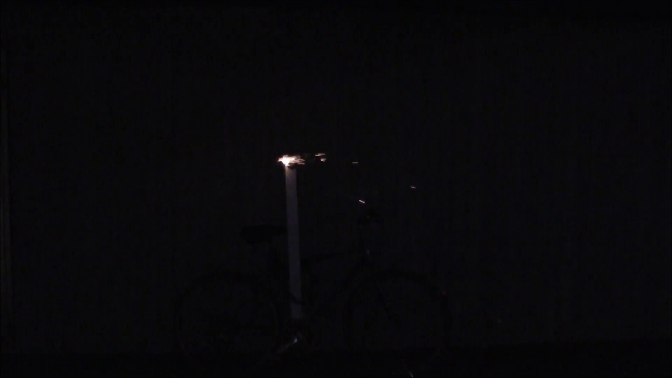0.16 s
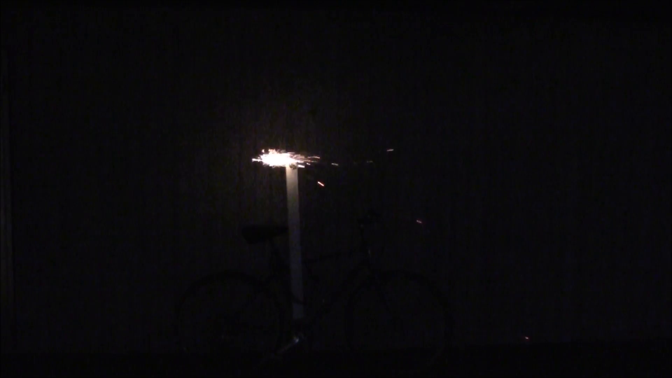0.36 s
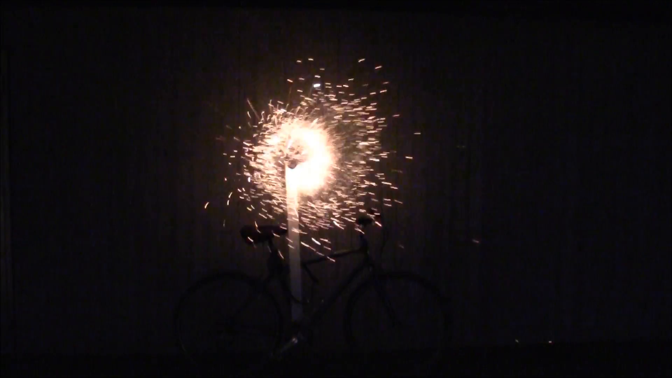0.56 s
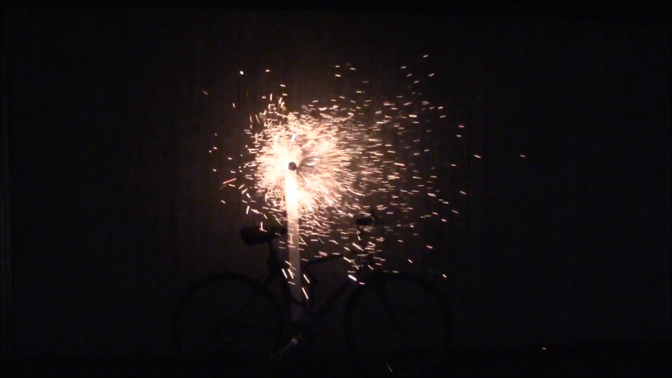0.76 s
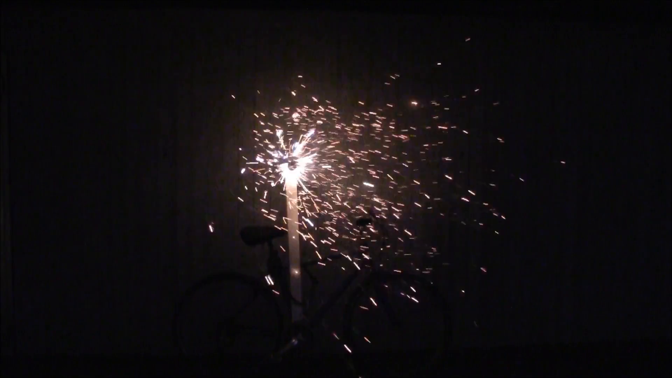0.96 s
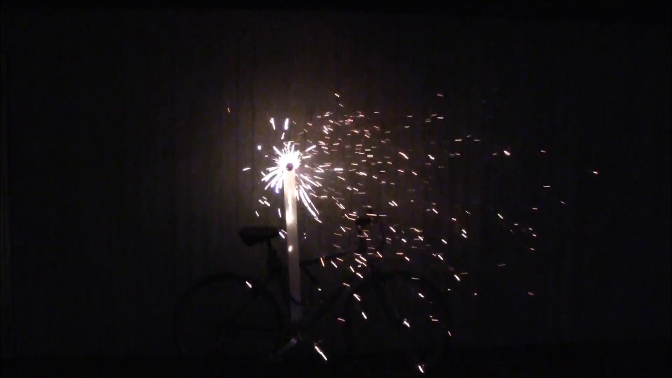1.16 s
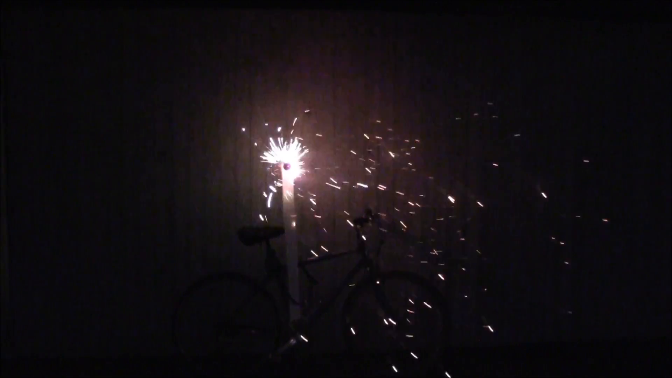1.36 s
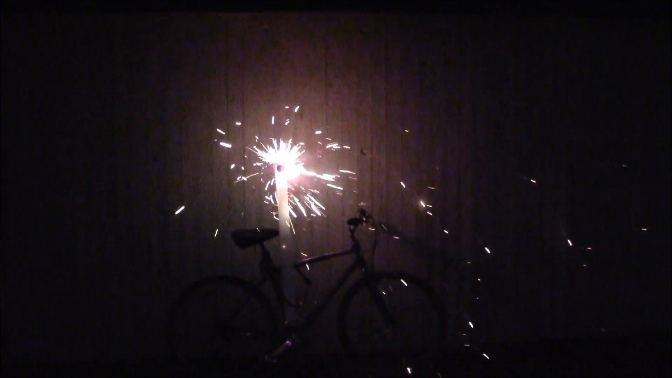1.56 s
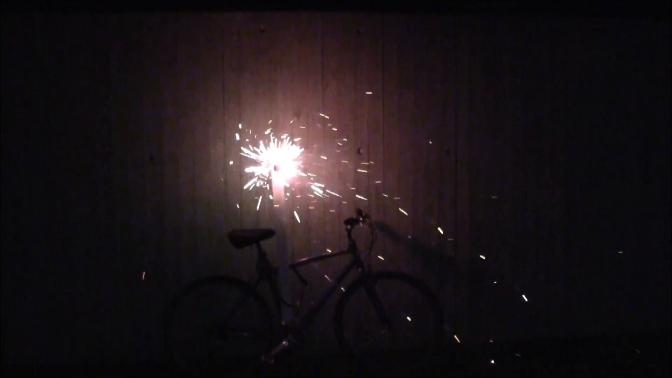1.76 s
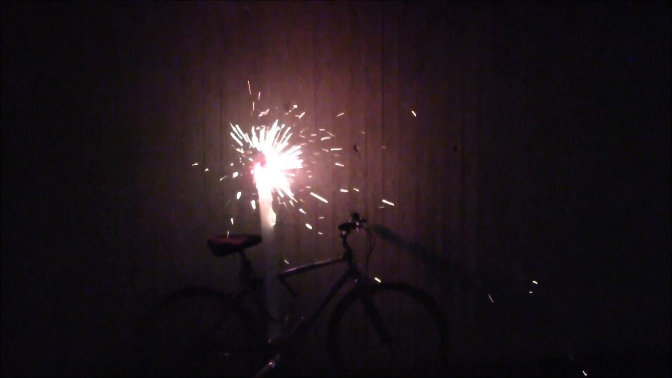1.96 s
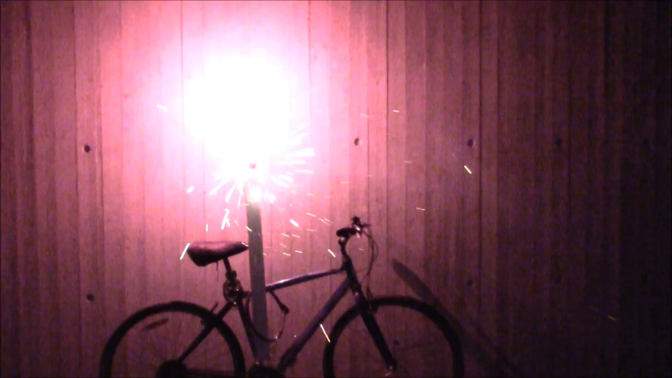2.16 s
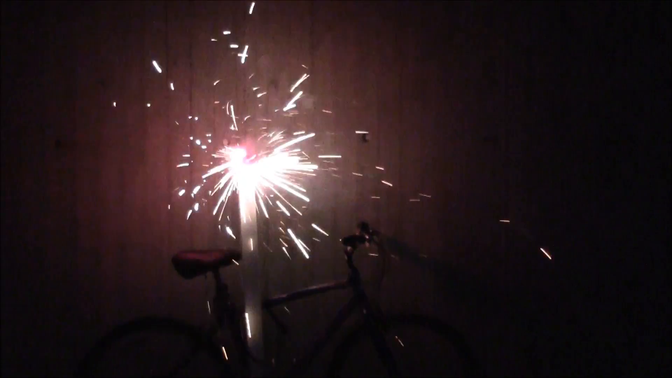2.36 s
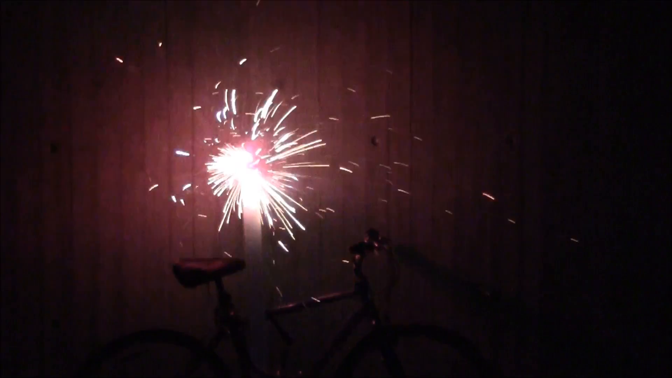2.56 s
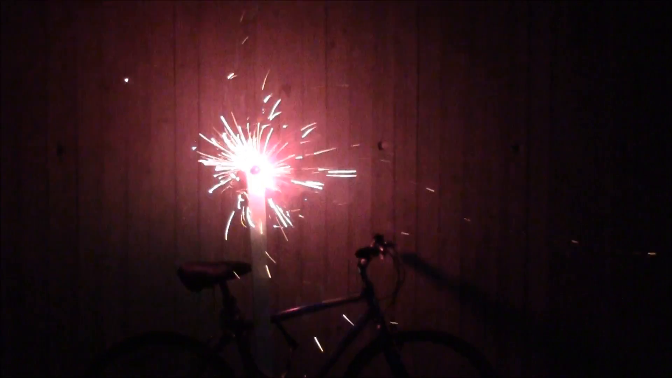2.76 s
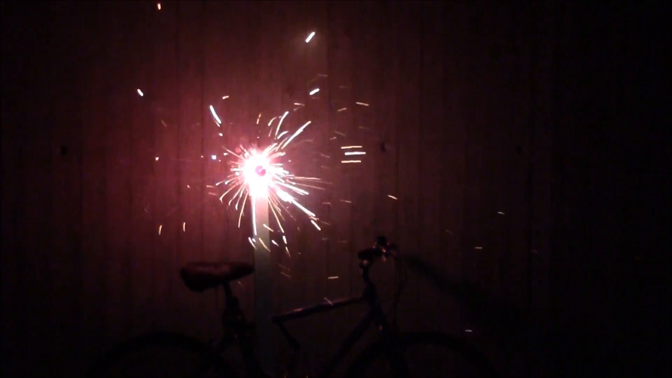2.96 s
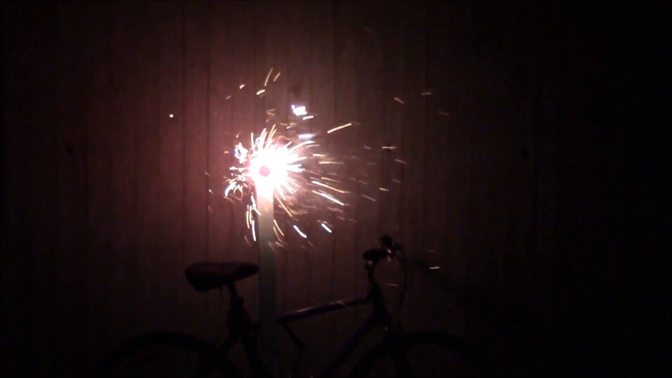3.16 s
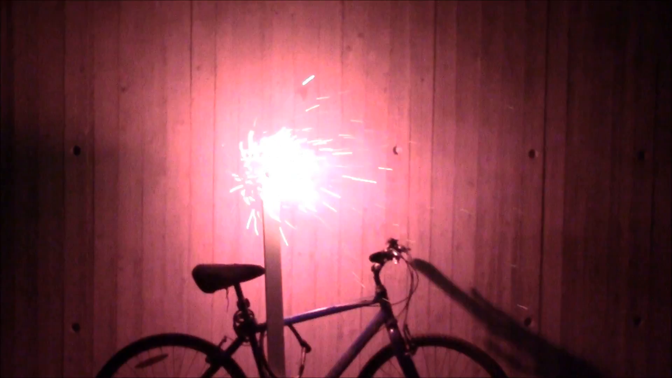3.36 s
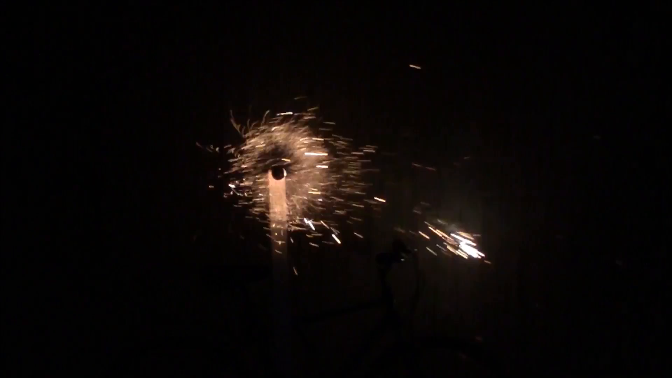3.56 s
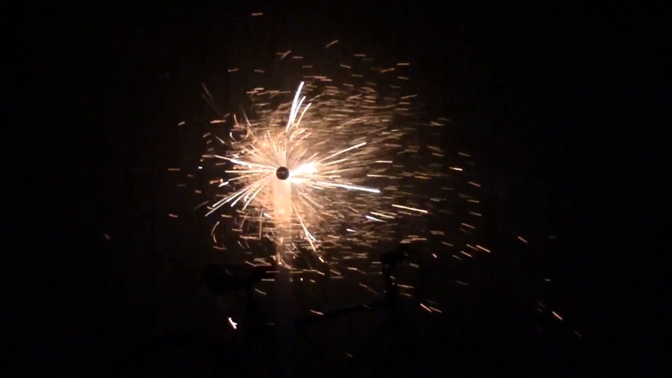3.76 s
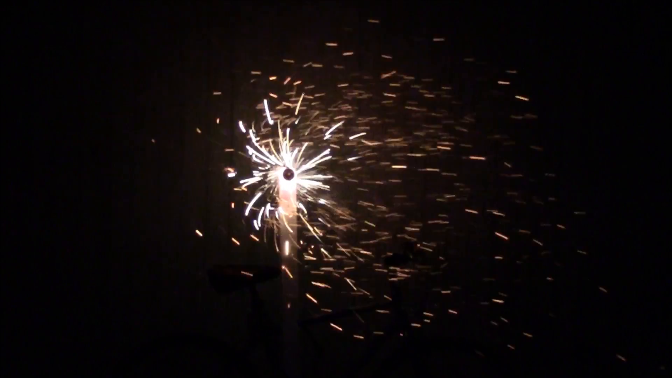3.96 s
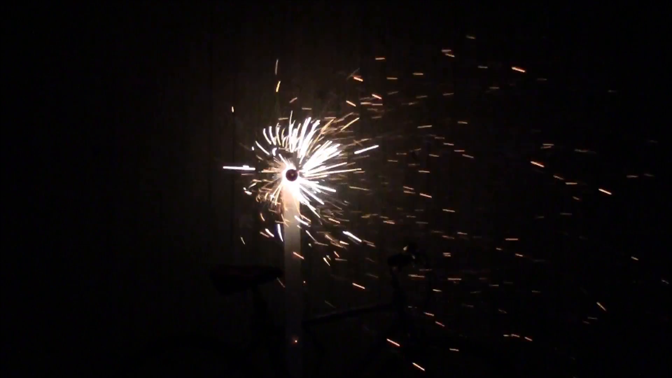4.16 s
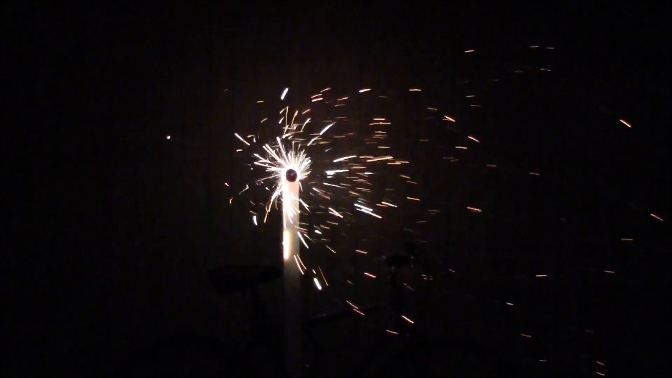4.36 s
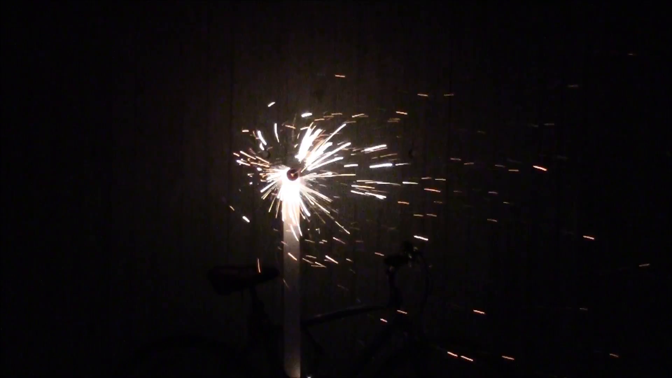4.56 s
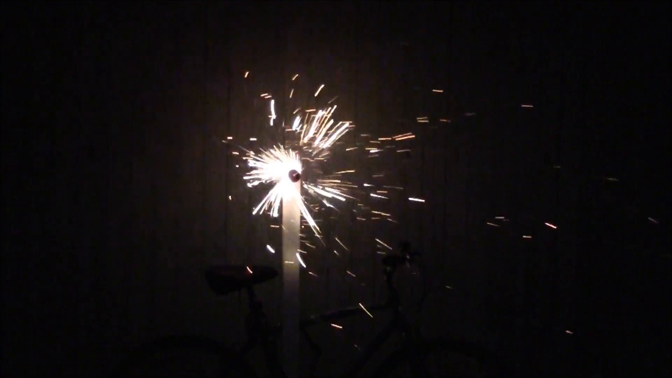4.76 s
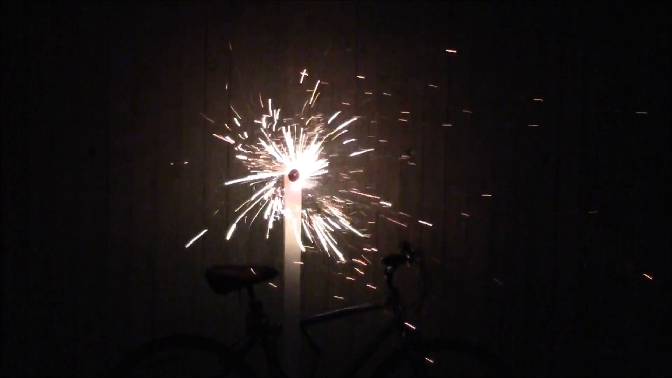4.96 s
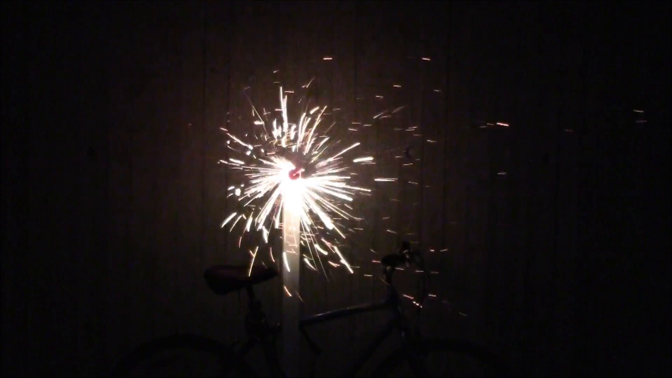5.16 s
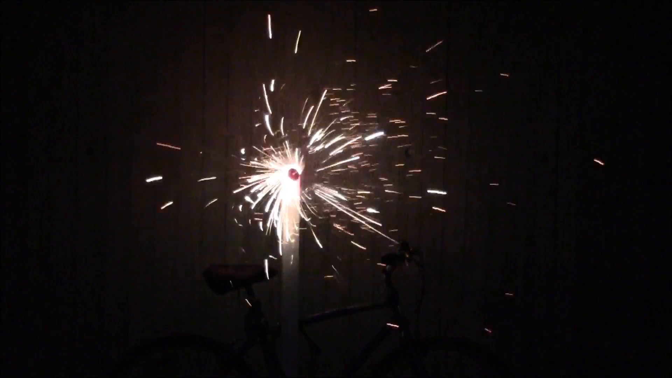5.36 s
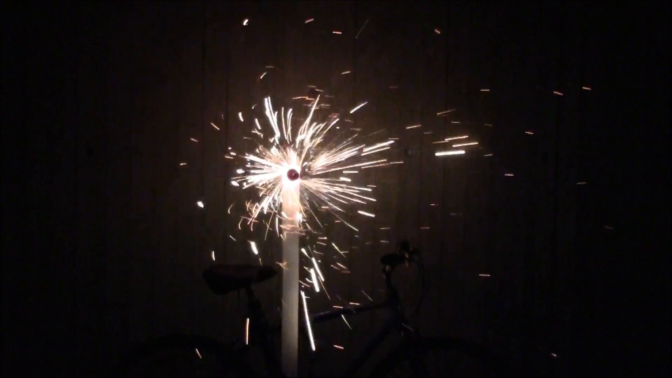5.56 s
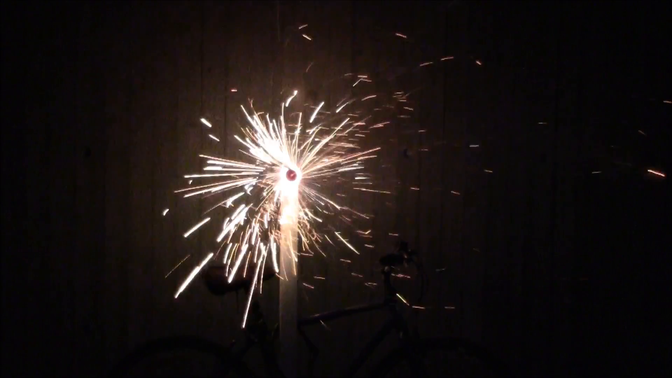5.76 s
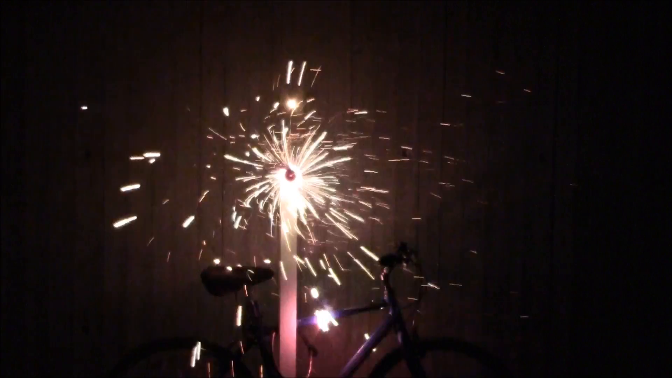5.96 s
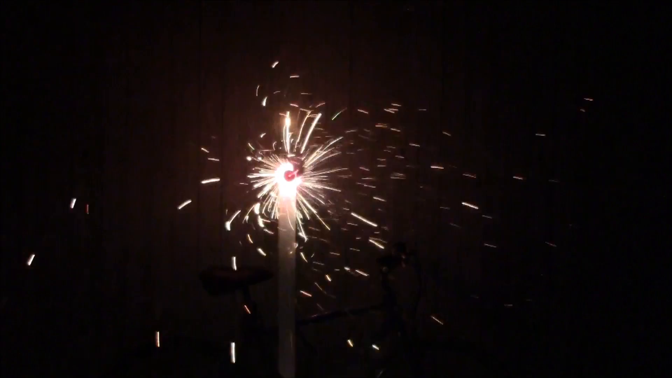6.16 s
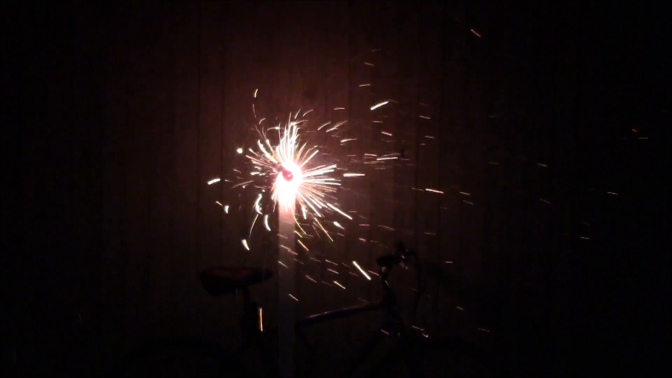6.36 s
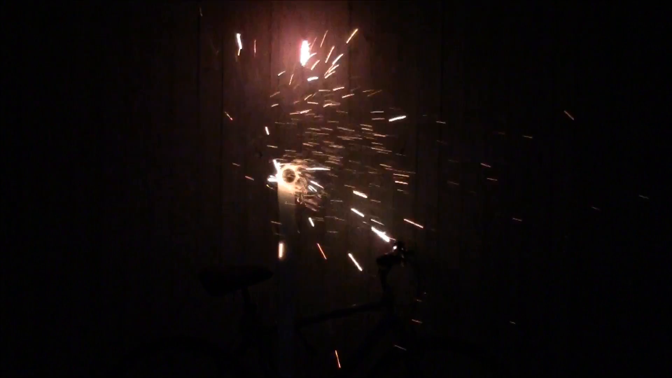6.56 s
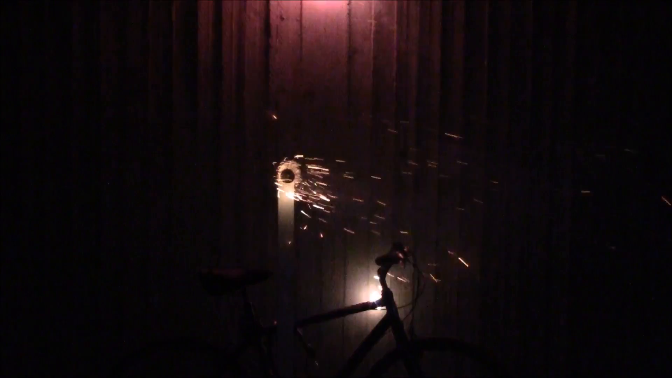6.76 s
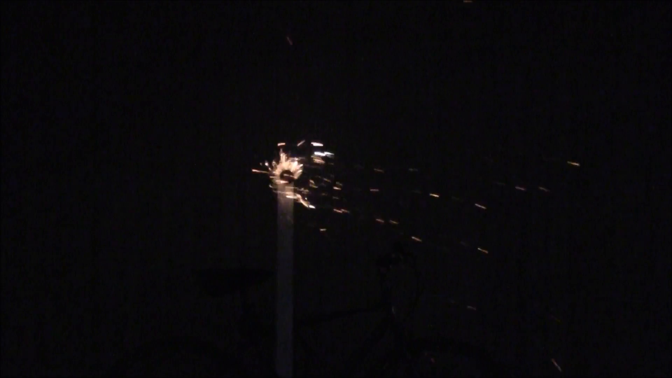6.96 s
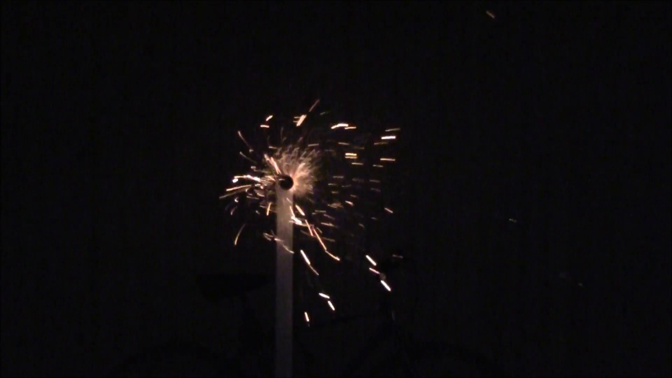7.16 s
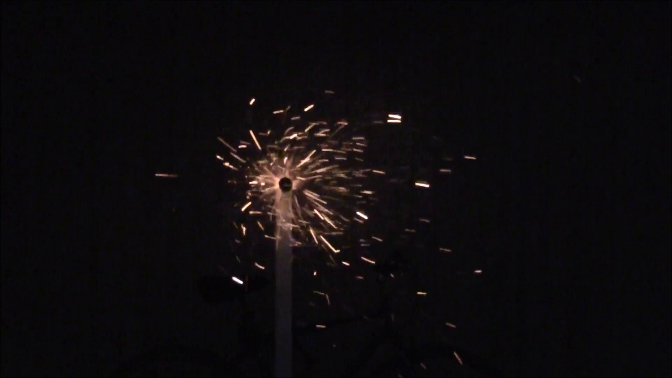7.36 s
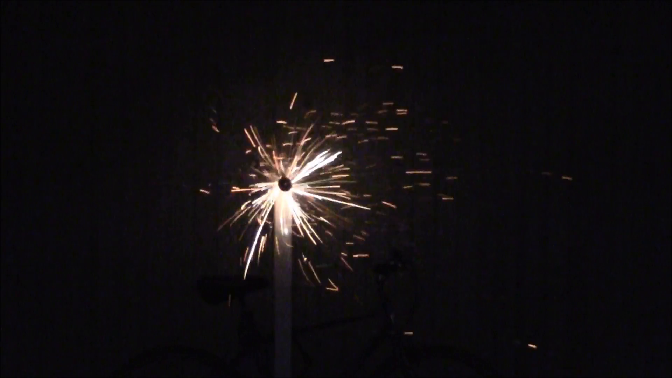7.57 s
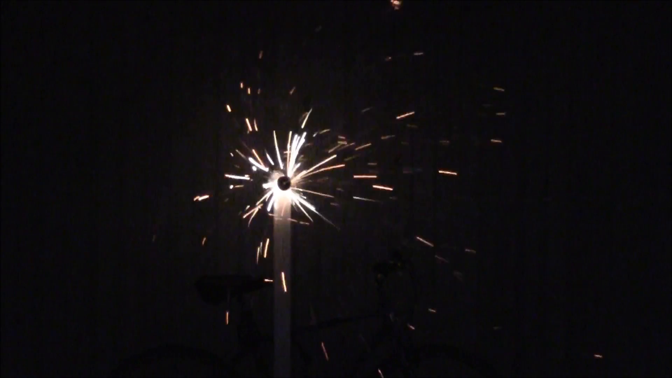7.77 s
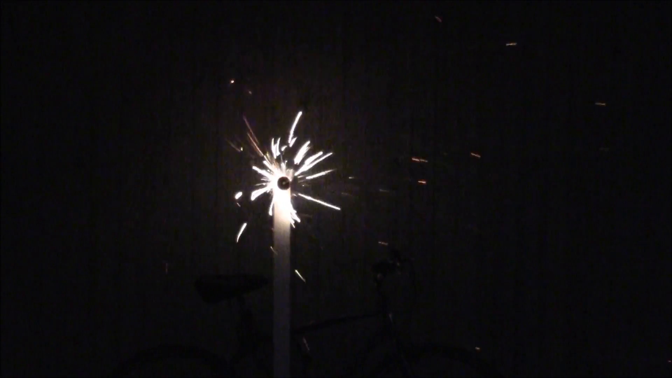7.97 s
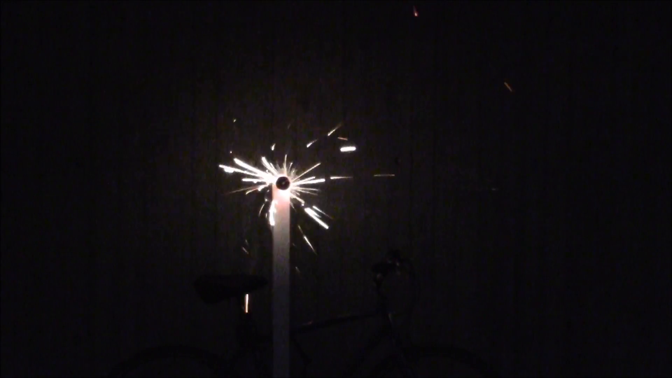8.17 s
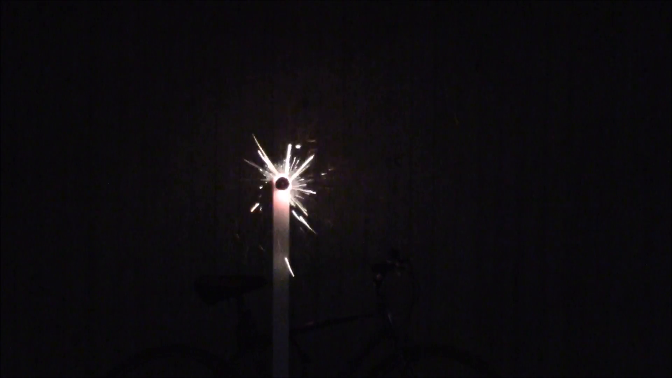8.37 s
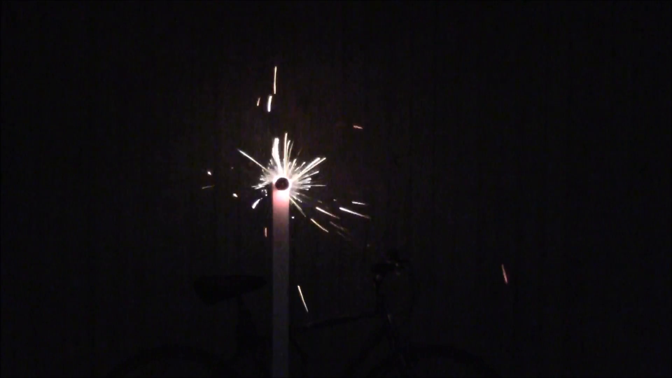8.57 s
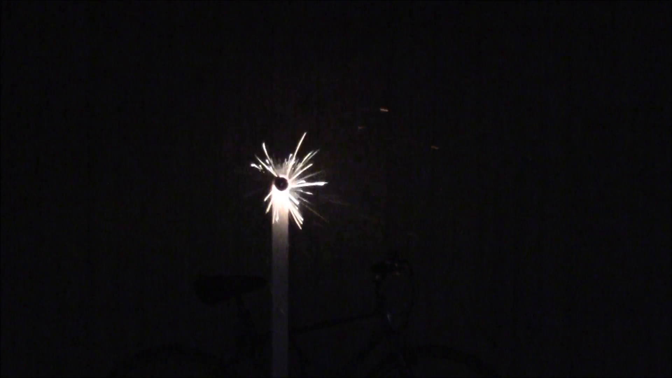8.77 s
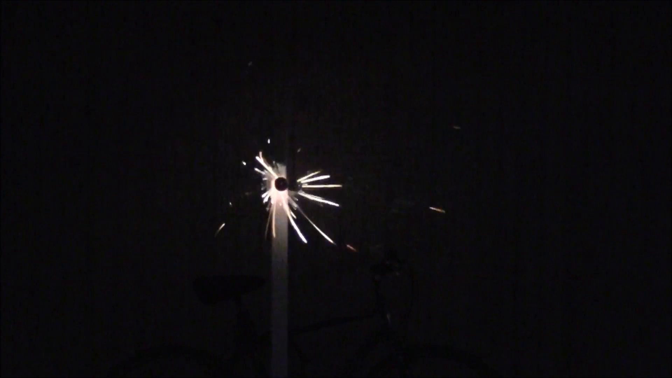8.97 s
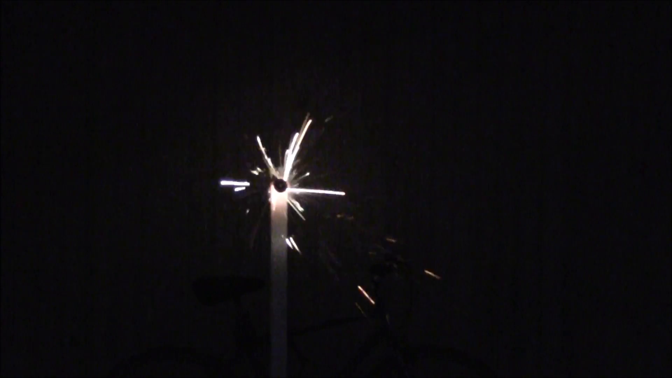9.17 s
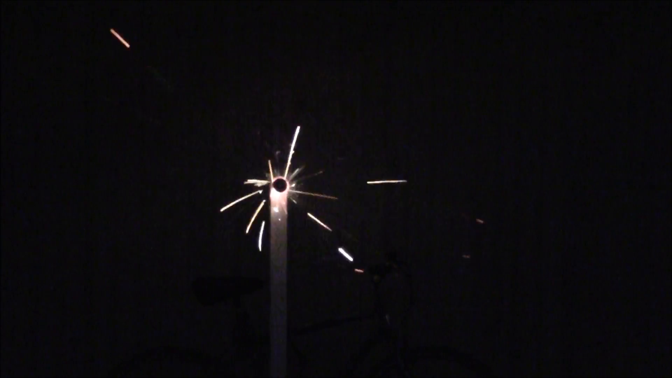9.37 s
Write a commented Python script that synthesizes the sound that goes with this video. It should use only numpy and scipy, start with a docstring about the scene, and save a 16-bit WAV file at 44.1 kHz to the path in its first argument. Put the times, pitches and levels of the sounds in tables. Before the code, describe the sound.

Outdoors near a wall, a quiet sputter swells into the loud, fluttering hiss of a firework wheel spraying sparks, over a faint far-off hum. Sharp little pops break through now and then. Twice the rushing drops away and flares back, the second time for longer. From the first dip, gusts buffet the microphone harder with low thumps, and the sound ducks slightly after the loudest peaks.

```python
"""A wheel firework spins on a post before a plank wall at night; wall, post and ground add short echoes.
Its jet catches at half a second, then roars, hisses and throbs once a turn over a distant hum. Burning
stars pop out from 1.5 s on. The jet stalls near 3.5 s as wind starts to thump harder on the microphone
ports. The hum fades by 5 s; the jet stalls again near 6.6 s, pops and flares back to burn to the end.
Throughout, the camera's limiter ducks after loud peaks."""
import sys
import numpy as np
from scipy import signal
from scipy.fft import rfft, irfft, next_fast_len
from scipy.io import wavfile
from scipy.ndimage import uniform_filter1d, map_coordinates

SR = 44100
rng = np.random.default_rng(int(sys.argv[2]) if len(sys.argv) > 2 else 0)


def transcribe(u):
    """Save the signal u as a 16-bit wav file named by the first command-line argument.

    u: samples, shape (n,) or (channels, n), limited to [-1, 1]; the rate is SR.
    q: integer samples, one column per channel.
    """
    v = np.clip(np.atleast_2d(u).T, -1, 1)
    q = np.round(v * 32767).astype(np.int16)
    wavfile.write(sys.argv[1], SR, q)


N = 415863


def amp(db):
    return 10 ** (np.asarray(db) / 20)


def unit(x):
    return x / np.sqrt(np.mean(x ** 2) + 1e-20)


def along(points, hz):
    """Read (freq_hz, value) points on a log axis."""
    f, v = np.transpose(points)
    return np.interp(np.log(hz + 1), np.log(f + 1), v)


def curves(rows):
    """One value per sample for each column after the time."""
    s, *cols = np.transpose(rows)
    return [np.interp(np.arange(N) / SR, s, c) for c in cols]


def wobble(rate):
    """A smooth random curve, rate knots a second."""
    coarse = np.arange(0, N + 64, 64)
    return np.interp(np.arange(N), coarse, map_coordinates(rng.standard_normal(1000), [coarse * rate / SR]))


def filtered(x, response):
    """Shape x with a complex frequency response."""
    m = next_fast_len(N + 8192, True)
    return irfft(rfft(x, m) * response(np.fft.rfftfreq(m, 1 / SR)), m)[..., :N]


def jet():
    """Burning powder: four bands of turbulence; the nozzle faces the camera once a turn."""
    burn = [(0, -43.5, -35), (.25, -39.5, -33), (.4, -35, -30.5), (.48, -23.5, -15.5), (.78, -20, -16),
            (.94, -20.5, -22), (1.02, -21, -27.5), (1.18, -22, -27), (1.46, -15, -22.5),
            (1.62, -15.5, -22.5), (2.1, -16, -18.5), (2.31, -15.5, -18.5), (2.42, -17, -19.5),
            (2.68, -19, -20), (2.91, -17.5, -18.5), (3.04, -17, -23.5), (3.11, -19, -27.5),
            (3.28, -23.5, -35.5), (3.34, -20.5, -32.5), (3.44, -22, -32), (3.47, -36, -36),
            (3.56, -28.5, -33), (3.63, -22.5, -20.5), (3.93, -25, -25.5), (4.12, -22.5, -24.5),
            (4.36, -25.5, -26.5), (4.48, -20, -22.5), (4.65, -19, -22.5), (5.05, -19, -19),
            (5.55, -21.5, -18.5), (5.86, -20, -19), (5.95, -19, -21.5), (6.28, -13.5, -21), (6.5, -17, -20),
            (6.63, -32.5, -35.5), (6.8, -35, -38), (6.99, -38.5, -45.5), (7.12, -30.5, -28.5),
            (7.3, -19, -18), (7.55, -19.5, -20.5), (7.85, -24, -23), (7.96, -26.5, -24.5),
            (8.09, -24.5, -24), (8.22, -25.5, -23.5), (8.4, -23.5, -21.5), (8.98, -22.5, -19.5),
            (9.43, -23, -19)]  # main fades: time_s, roar_db, hiss_db
    flame = [(0, -35.5), (.35, -35.5), (.47, -30), (.8, -33.5), (2.3, -32), (2.9, -37.5), (3.1, -32.5),
             (3.42, -27), (3.5, -35), (3.95, -39.5), (4.4, -37.5), (5.0, -33.5), (5.55, -31.5), (5.85, -33),
             (6.28, -33), (6.55, -28.5), (6.63, -40.5), (7.12, -41), (7.33, -27.5), (7.54, -28),
             (7.6, -33.5), (7.93, -39.5), (8.4, -34.5), (9.43, -37)]  # low flame body: time_s, level_db
    sparks = [(0, -20), (.25, -18), (.47, -3), (.7, -14), (1.2, -12), (1.6, -6.5), (3.1, -8), (3.5, 0),
              (4.0, 1.5), (4.5, 0.5), (5.85, 2), (6.0, -3.5), (6.5, -4.5), (6.8, 5.5), (7.3, 1),
              (9.43, 1.5)]  # sizzle: time_s, over_hiss_db
    spin = [(0, 31), (1.5, 28), (1.9, 40), (2.86, 55), (3.86, 55), (4.44, 33), (5.1, 29), (5.8, 54),
            (6.2, 41), (7.04, 48), (7.8, 44), (8.9, 31), (9.43, 36)]  # wheel speed: time_s, turns_per_s
    surges = [(.06, .015, 6, -3), (.1, .02, 3.5, 1), (.15, 0.034, 6.5, 2), (.225, 0.02, -8, 1),
              (.6, .02, -4, 3), (1.525, 0.055, -9.5, -3), (2.3, 0.067, 1.5, -1), (3.2, .03, 2, -3),
              (5.2, 0.087, 1, 4.5), (5.88, 0.016, 1.5, -2), (5.929, 0.016, 1.5, 13), (7.04, 0.038, 0, 9),
              (8.07, .03, 1, -1), (8.85, 0.068, 2.5, -1)]  # stalls and flares: centre_s, half_width_s, strength, extra_body_db
    # tone of each band: freq_hz, level_db
    body_eq = [(150, -22), (300, -3), (450, 4), (800, 3.5), (1200, 1), (2000, -10), (4000, -20)]
    roar_eq = [(500, -58), (1000, -17), (1500, -6.5), (2300, -2), (3600, -3), (4800, -7), (7000, -24),
               (12000, -48)]
    hiss_eq = [(1500, -39), (3000, -12.5), (4500, -9), (6500, 0.5), (8000, -2.5), (10000, -5.5),
               (16000, -29.5)]
    sizzle_eq = [(4000, -58), (7000, -5.5), (9000, -1.5), (10500, 0), (12000, -3), (14000, -5.5),
                 (16000, -4)]
    roar_db, hiss_db = curves(burn)
    t = np.arange(N) / SR
    bumps = np.array([np.clip(1 - np.abs(t - s) / half_s, 0, 1) for s, half_s, *_ in surges])
    surge, flare_db = np.array(surges)[:, 2:].T @ bumps
    spin_hz = curves(spin)[0] + 7 * wobble(8)
    throb = 3.08 * np.cos(2 * np.pi * np.cumsum(spin_hz) / SR)
    sputter = 0.45 * wobble(30) + 0.22 * wobble(60) + surge
    flutter = 0.66 * wobble(22)
    flow = turbulence(crackle=1.2)
    # the roar brightens as the hiss outweighs it
    tilt_db = np.interp(flow[1], t, 0.58 + 0.3552 * (hiss_db - roar_db))
    body = amp(curves(flame)[0] + flare_db + 0.28 * sputter + 1.56 * wobble(20))
    body *= rush(flow, body_eq, patchy_db=0.5)
    roar = amp(roar_db + 0.7 * sputter + 0.31 * throb + 0.68 * wobble(11))
    roar *= rush(flow, roar_eq, patchy_db=1.5, tilt_db=tilt_db)
    hiss = amp(hiss_db + 1.04 * sputter + 0.21 * throb + flutter)
    hiss *= rush(flow, hiss_eq, patchy_db=1.4)
    sizzle = amp(hiss_db + curves(sparks)[0] + 0.68 * sputter + 0.65 * throb + 0.67 * flutter)
    sizzle *= rush(flow, sizzle_eq, patchy_db=2.4)
    return body + roar + hiss + sizzle


def turbulence(crackle):
    """White noise with sparse sharp shocks, as short-time spectra."""
    return signal.stft(rng.standard_normal(N) * (1 + crackle * (rng.random(N) < .008)), SR, nperseg=512)


def rush(flow, eq, patchy_db, tilt_db=0):
    """One band of the flow at rms 1, with patches of random gain and a tilt per octave."""
    hz, _, spectra = flow
    patches = uniform_filter1d(rng.standard_normal(spectra.shape), size=9, axis=0)
    patches = unit(uniform_filter1d(patches, size=6, axis=1))
    colour_db = along(eq, hz)[:, None] + np.log2((hz[:, None] + 1) / 2400) * tilt_db
    return unit(signal.istft(spectra * amp(patchy_db * patches + colour_db), nperseg=512)[1][:N])


def pops():
    """A star leaves the tube: a blip of the tube's note in a dull puff of noise. Returns mid, side."""
    stars = [(1.501, 12.5, 1690, 0.0047, 8), (1.619, 5, 2420, 0.0054, .5), (3.173, -2, 1520, 0.011, 9),
             (3.349, -7, 1490, 0.014, 4), (3.394, -3, 1290, 0.0079, .1), (3.444, -2, 1705, 0.0083, 4),
             (5.914, -7.5, 700, 0.0091, -5), (5.921, -7, 1310, .008, -1), (6.739, -16, 2170, 0.0076, 0),
             (7.024, -15, 520, .009, .1), (7.031, -9, 821, 0.0095, .1)]  # start_s, level_db, pitch_hz, note_t60_s, left_over_right_db
    out, t = np.zeros((2, N + SR)), np.arange(SR // 8) / SR
    attack = 1 - np.exp(-t / 0.00082)
    for s, db, hz, t60, pan_db in stars:
        puff = uniform_filter1d(rng.standard_normal(len(t)), size=6) * amp(-60 * t / (4 * t60))
        note = np.sin(2 * np.pi * hz * t) * amp(-60 * t / t60)
        pan = (amp(pan_db) - 1) / (amp(pan_db) + 1)
        out[:, round(s * SR):][:, :len(t)] += amp(db) * attack * (1.17 * note + 0.42 * puff) * [[1], [pan]]
    low_cut = signal.butter(2, 450, "high", fs=SR, output="sos")  # the pops carry no deep bass
    return signal.sosfilt(low_cut, out[:, :N])


def rings_and_echoes(x):
    """Narrow rings colour the hiss; nearby surfaces add dulled copies to the direct sound."""
    tube = [(1475, 32, -30), (2136, 15, -19), (2550, 29, -19), (3220, 15, -26), (3780, 36, -7),
            (4380, 15, -8), (5990, 16, 1.5), (6400, 15, -24)]  # resonances: pitch_hz, width_hz, relative_db
    ring_mix = [(0, 2.2), (.4, 2), (.55, 1.2), (9.43, 1.05)]  # strong at first, weaker once the jet catches: time_s, gain
    echoes = [(1.235, 0.057, 1900), (1.94, 0.065, 4800), (2.367, 0.119, 1600), (2.559, -0.068, 1800),
              (2.721, 0.393, 900), (2.905, -0.212, 700), (3.047, -0.17, 700), (3.234, 0.097, 5500),
              (3.322, 0.075, 7500), (3.693, -0.056, 2300), (4.155, -0.036, 3700), (4.658, 0.088, 1200),
              (4.832, 0.043, 4600), (5.823, -0.023, 14100), (5.929, 0.065, 10200), (6.53, 0.098, 2800),
              (7.018, 0.076, 700), (7.488, 0.054, 11200), (7.812, 0.17, 1000), (8.368, 0.025, 9300),
              (8.554, 0.03, 1800), (9.096, -0.047, 2500), (9.569, -0.058, 2700), (10.091, -0.154, 700),
              (12.88, 0.046, 700), (14.483, 0.045, 1100), (17.807, 0.037, 1800), (24.8, -0.028, 1000)]  # wall, post and ground: delay_ms, relative_gain, dull_above_hz
    hz = np.fft.rfftfreq(8192, 1 / SR)
    rings = sum(amp(db) * 1j * hz * w / (c * c - hz * hz + 1j * hz * w) for c, w, db in tube)
    paths = 1 + 1.19 * sum(gain * np.exp(-2j * np.pi * hz * ms / 1000) / (1 + 1j * hz / dull_hz)
                           for ms, gain, dull_hz in echoes)
    impulses = irfft([paths, rings * paths])[:, :4096]
    plain, ringing = signal.oaconvolve(x[None], impulses, axes=1)[:, :N]
    return plain + curves(ring_mix)[0] * ringing


def shimmer(fire):
    """The treble flickers sideways. Returns a side signal."""
    width = [(5500, -65), (6300, -32), (6700, -26), (7200, -36), (8300, -25), (9000, -18), (9800, -32),
             (11300, -28), (12500, -16.5), (14000, -24), (15700, -40)]  # stereo spread: freq_hz, relative_db
    return filtered(fire, lambda hz: 1j * amp(along(width, hz))) * amp(4.3 * wobble(5.1) - 3.5)


def wind():
    """Lumpy eddies rumble on the two ports; the pitch drifts over time. Returns mid, side."""
    pitch = [(0, 130), (.6, 148), (1.1, 160), (1.35, 102), (1.7, 165.5), (2.35, 118), (3.0, 169),
             (3.55, 150), (3.9, 185), (4.3, 183), (5.1, 197), (6.6, 200), (7.4, 238), (8.0, 165),
             (8.7, 140), (9.43, 130)]  # rumble: time_s, centre_hz
    level_db, centre_hz = gusts_db(), curves(pitch)[0]
    full_gust_db = -28.5  # weaker wind sounds narrower
    side_db = 1 + 0.8 * np.minimum(uniform_filter1d(level_db, size=SR // 8) - full_gust_db, 0)
    pair, air = np.zeros((2, N)), rng.standard_normal((2, N))
    for c in (55, 110, 220):  # band centres, Hz
        share = np.exp(-(np.log2(centre_hz / c) / 0.77) ** 2)
        eq = [(c / 8, -24), (c / 2, -6), (c, 0), (1.58 * c, -8),
              (2.54 * c, -24), (8 * c, -50), (20 * c, -90)]
        pair += share * unit(filtered(air, lambda hz: amp(along(eq, hz))))
    pair *= amp(1.9 * np.array([wobble(28), wobble(27.86)]))  # lumps
    pair /= np.sqrt(np.abs(uniform_filter1d(pair ** 2, size=SR // 6, axis=1)) + 1e-9)  # even out drift
    return amp(level_db) * pair * [np.ones(N), amp(side_db)]


def gusts_db():
    """Each gust rises, holds and falls back to a wandering breeze."""
    gusts = [(0, 0.41, -29), (1.3, 0.15, -24.5), (2.283, 0.027, -25), (2.392, .03, -27.5),
             (2.587, 0.019, -21.5), (2.73, 0.0091, -27.5), (2.82, 0.022, -29), (2.954, .02, -29.5),
             (3.33, 0.059, -30), (3.52, 0.035, -22), (3.644, 0.12, -16.5), (3.79, .05, -21),
             (3.852, 0.15, -18.5), (4.116, 0.04, -17.5), (4.185, .14, -23), (5.122, 0.056, -21.5),
             (5.214, 0.027, -21.5), (5.34, 0.012, -26), (5.46, .02, -25.5), (5.62, .01, -31),
             (5.895, 0.043, -28.5), (6.116, 0.14, -22.5), (6.38, 0.12, -18.5), (6.593, 0.024, -21),
             (6.91, .01, -36.5), (7.96, .01, -37), (8.436, .02, -33), (8.58, .02, -36), (8.95, 0.036, -36),
             (8.117, .05, -34), (9.1, .1, -36), (9.382, .01, -27)]  # start_s, hold_s, level_db
    breeze = [(0, -41), (1.2, -38), (1.9, -42.5), (3.3, -37), (4.5, -47), (5.4, -38), (7.2, -47.5),
              (9.43, -36.5)]  # time_s, level_db
    rise_db_per_s, fall_db_per_s = 208, 220
    t, level_db = np.arange(N) / SR, curves(breeze)[0] + 2 * wobble(16)
    for s, hold_s, db in gusts:
        drop_db = rise_db_per_s * np.maximum(s - t, 0) + fall_db_per_s * np.maximum(t - s - hold_s, 0)
        level_db = np.maximum(level_db, db - drop_db)
    return level_db


def thumps():
    """One eddy shoves the membrane: a cycle or two under a quick swell."""
    eddies = [(4.299, -3, 143), (4.818, -18, 176.3), (5.099, -19, 213), (5.192, -38, 196),
              (5.321, -25, 177), (5.458, -10, 279), (5.9, -28, 137), (6.107, -25, 188), (6.372, -10, 189),
              (6.422, -13, 248), (6.885, -33, 200), (7.844, -28, 140), (7.947, -20, 175), (8.054, -18, 112),
              (8.115, -19, 170), (8.321, -27, 185.7), (8.913, -26, 212)]  # start_s, level_db, pitch_hz
    out, t = np.zeros(N + SR), np.arange(SR // 20) / SR
    swell = t / 0.0056 * np.exp(1 - t / 0.0036)
    for s, db, hz in eddies:
        out[round(s * SR):][:len(t)] += amp(db) * swell * np.sin(2 * np.pi * hz * t)
    return out[:N]


def wind_filter(mid, side):
    """The camera's low cut fades in on the wind and later eases; the rumble folds to mono."""
    low_cut = [(2.6, 0.15), (3.2, 0.39), (4.2, 0.3), (4.33, 0.89), (7.9, 1), (8.6, .75), (9.43, 0.56)]  # time_s, wet_share
    corner_hz, mono_from_s = 85, 4.18
    thin = filtered(mid, lambda hz: (1j * hz / (corner_hz + 1j * hz)) ** 3)
    wet = curves(low_cut)[0]
    width = np.clip(1 - (np.arange(N) / SR - mono_from_s) / 0.18, 0, 1) ** 2
    return (1 - wet) * mid + wet * thin, width * side


def hum(pitch_hz=165):
    """A distant drone that wavers slightly."""
    fade = [(0, -52), (.4, -37.5), (1.45, -40), (2.5, -38), (3.2, -43), (4.7, -47.5), (4.85, -62)]  # time_s, level_db
    phase = 2 * np.pi * pitch_hz * np.arange(N) / SR + 0.41 * wobble(4.9)
    return np.sqrt(2) * amp(curves(fade)[0] + 2.7 * wobble(5.7)) * np.sin(phase)


def scene():
    """Firework, wind and hum, mixed from mid and side to left and right."""
    star_mid, star_side = pops()
    fire = rings_and_echoes(jet() + star_mid)
    fire_side = shimmer(fire) + star_side
    wind_mid, wind_side = wind()
    wind_mid, wind_side = wind_filter(wind_mid + thumps(), wind_side)
    mid, side = fire + wind_mid + hum(), fire_side + wind_side
    return np.array([mid + side, mid - side])


def limiter_gain(level, ceiling, release_s):
    """Drops at once to keep the level under the ceiling, then creeps back exponentially."""
    fading = np.arange(N) / (release_s * SR)
    needed = np.log(np.clip(1 - ceiling / (level + 1e-9), 1e-9, 1))
    return 1 - np.exp(np.maximum.accumulate(needed + fading) - fading)


def record(dry):
    """The camera: a limiter on the level of the last 2 ms, soft clipping, then a treble cut-off."""
    top_hz = 15750
    level = uniform_filter1d(np.abs(dry).max(0), size=81, origin=40)
    limited = dry * limiter_gain(level, ceiling=0.41, release_s=0.055)
    rounded = limited / (1 + np.abs(limited) ** 8) ** (1 / 8)
    return np.clip(filtered(rounded, lambda hz: hz < top_hz), -1, 1)


dry = scene()
out = record(dry)
transcribe(out)
```